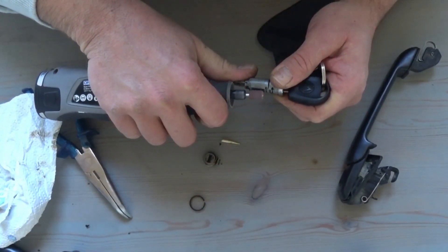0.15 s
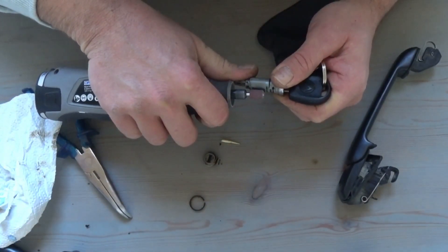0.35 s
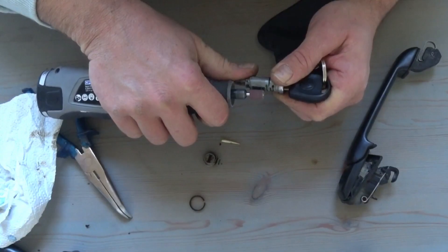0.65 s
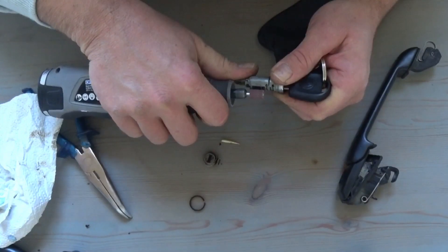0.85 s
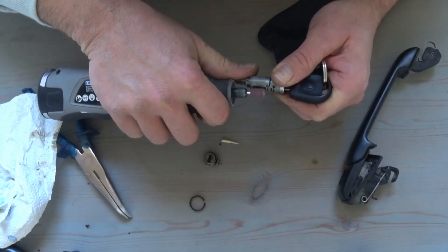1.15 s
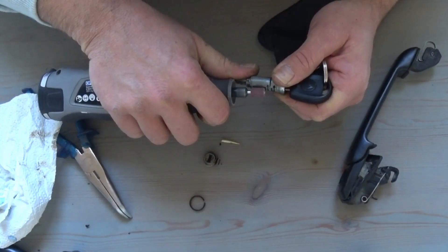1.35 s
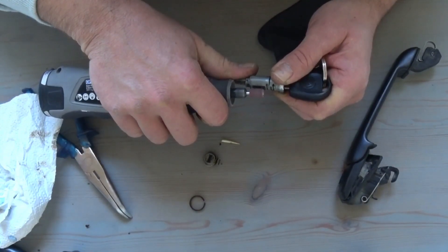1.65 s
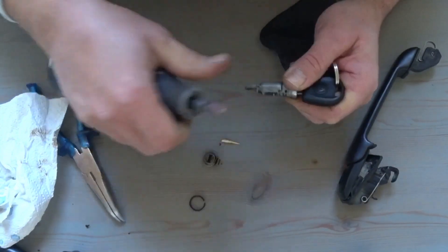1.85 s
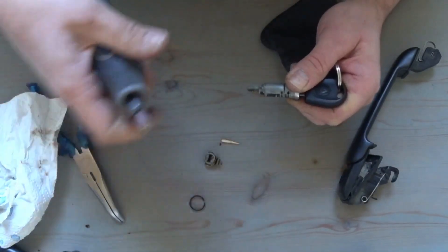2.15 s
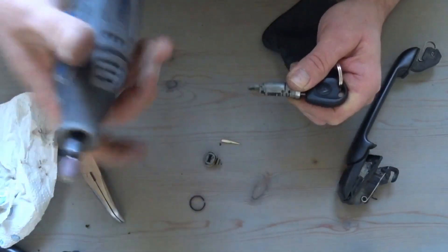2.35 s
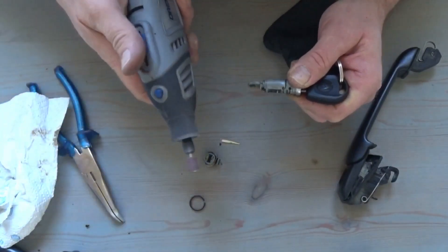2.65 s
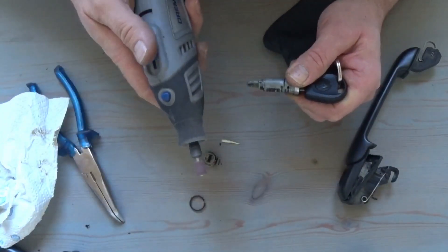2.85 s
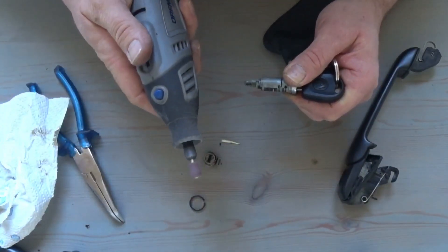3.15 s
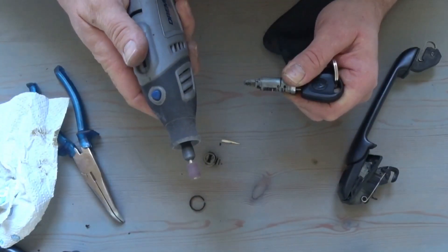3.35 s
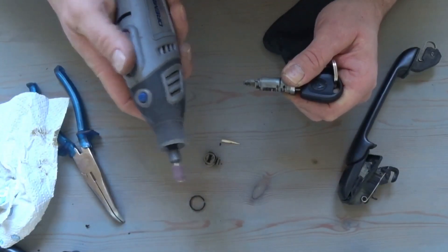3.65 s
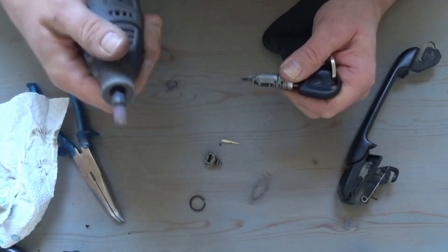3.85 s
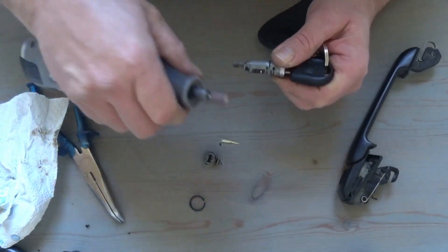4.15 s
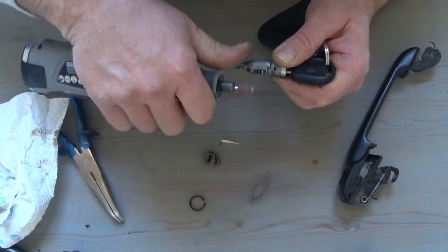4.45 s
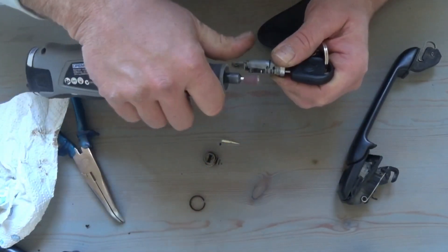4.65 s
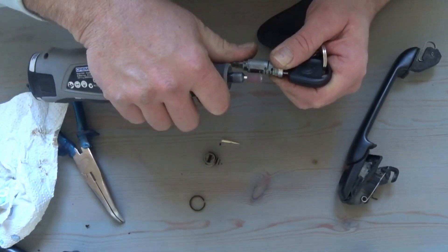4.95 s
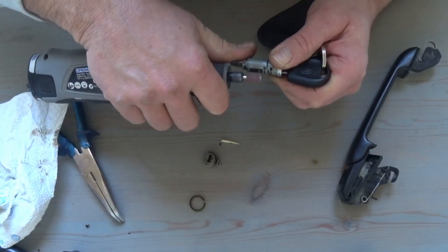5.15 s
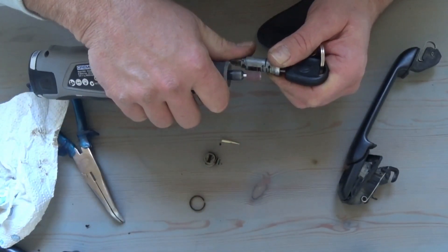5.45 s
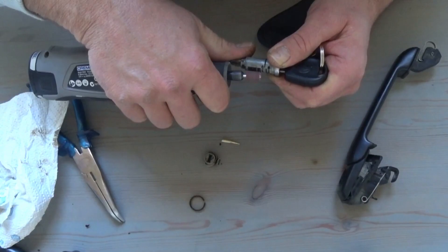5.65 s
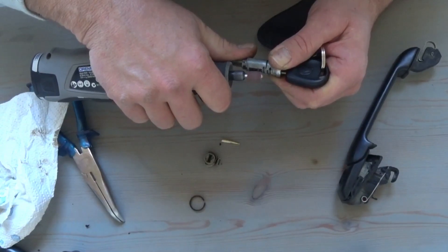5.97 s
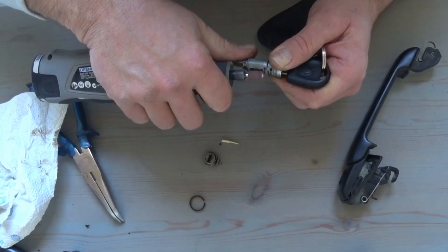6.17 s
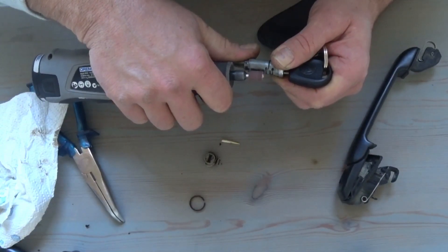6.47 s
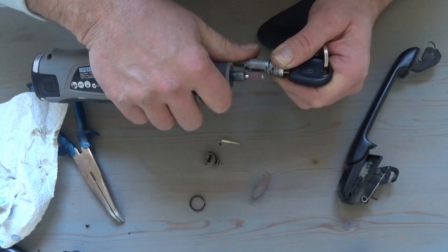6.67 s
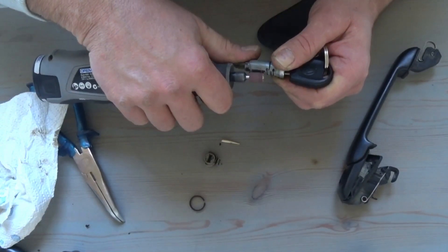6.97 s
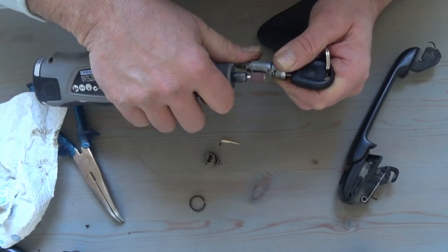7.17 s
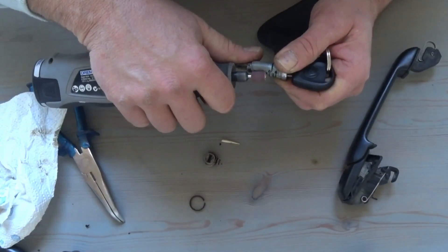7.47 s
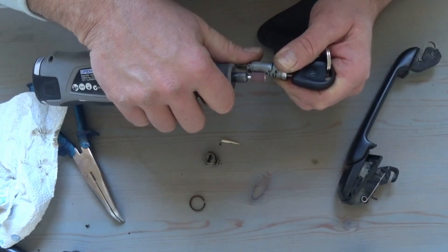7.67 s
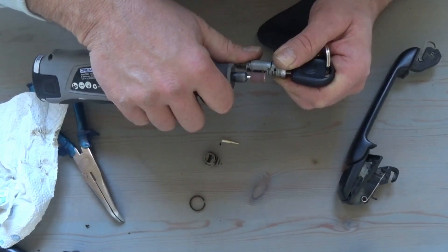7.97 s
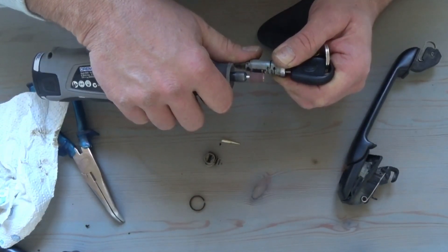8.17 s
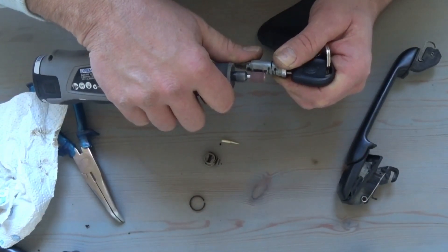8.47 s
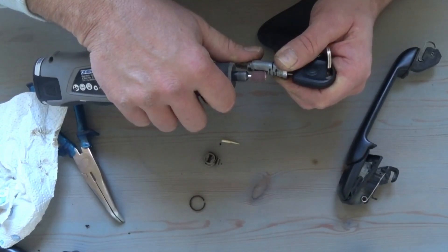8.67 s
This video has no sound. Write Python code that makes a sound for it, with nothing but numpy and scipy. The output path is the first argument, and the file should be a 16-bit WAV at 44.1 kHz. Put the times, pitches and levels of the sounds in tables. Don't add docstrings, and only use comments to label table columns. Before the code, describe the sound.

Gritty metal grinding comes first over a sagging motor buzz, then a quick lift-off and two dull, woody knocks with a brief rattle. The tool spins free, hissing and whining steadily, shifting in tone as the hand turns it, then winds up to a much higher whine. Later the stone bites again in several rasping strokes with little catches, the motor slowing and recovering. Recorded close at a workshop bench, slightly left, with short reflections and a soft rumble.

```python
import sys
import numpy as np
from scipy import signal
from scipy.fft import rfft, irfft, next_fast_len
from scipy.io import wavfile
from scipy.ndimage import uniform_filter1d, map_coordinates

SR = 44100
rng = np.random.default_rng(int(sys.argv[2]) if len(sys.argv) > 2 else 0)


def level_to_linear(level):
    exponent = np.asarray(level, float) / 20
    return 10 ** exponent


def generate_wav(sig):
    pcm = np.round(np.clip(np.atleast_2d(sig).T, -1, 1) * 32767).astype(np.int16)
    wavfile.write(sys.argv[1], SR, pcm)


N = 388521
HZ = np.fft.rfftfreq(next_fast_len(N), 1 / SR)
T = np.arange(N) / SR

# t/s, speed/(turns per s), lag/s
SPEED_STEPS = [(-.192, 65.5, .178), (.604, 54.8, .173), (1.424, 88.2, .143), (2.25, 90.2, .242),
               (2.977, 157.8, .2), (4.68, 155, .05), (5.2, 155.8, .05), (5.389, 75, .185),
               (5.75, 108.1, .147), (6.17, 132, .07), (6.5, 85.9, .09), (7.266, 150, .16),
               (7.513, 90.8, .13), (7.984, 69.4, .216), (8.275, 84.7, .159)]
FREE_HZ, DIAL_S = (90, 157), 4.2
# start/s, end/s, rasp at start/dB, rasp at end/dB, tap level/dB
STROKES = [
    (-.05, 0.4, -36.5, -35, -9),
    (0.438, 1.578, -35, -37, -8.5),
    (5.386, 6.235, -31, -34.5, -5),
    (6.407, 6.65, -37, -29, -2),
    (6.638, 7.394, -31.5, -31.5, -30),
    (7.458, 7.624, -35.5, -29.5, -25),
    (7.686, 7.96, -30, -32, -17),
    (7.955, 9, -32.5, -35, -7),
]
BITE_S, LIFT_S, LIFT_OFF_S = 0.055, 0.11, 0.053
# start/s, end/s
DIGGING = [
    (.56, 1.56),
    (6.68, 7.5),
    (7.68, 9),
]
WANDER, SLIP = .003, .05
# start/s, end/s, change/dB
SKIMS = [
    (0, .13, -3),
    (0.362, .52, -2.5),
    (6.3, 6.5, 1.5),
    (7.43, 7.7, -4.5),
]

# f/Hz, level per Hz/dB
RASP_FAST = [(71, -57), (120, -31), (276, -30), (333, -12), (417, -18.5), (524, -10.5), (1110, -4),
             (1370, 3), (1720, -3.5), (2610, 4), (5250, -3.5), (7370, -10), (8900, -10), (10200, -5),
             (11000, -10), (14200, -47), (22000, -120)]
RASP_SLOW = [(71, -54), (120, -15.5), (270, -17.5), (333, -5), (657, -2), (809, -3.5), (1140, -12.5),
             (1370, -6.5), (2420, -13.5), (3090, -1), (3530, -11), (3950, -3.5), (6340, -16), (7510, -14.5),
             (11000, -14.5), (14200, -51), (22000, -120)]
# f/Hz, width/Hz, level/dB
LOCK = [(157, 20, 9.5), (315, 13, -29), (515, 19, 13), (580, 27, -21), (844, 77, 13), (874, 41, -0.5),
        (1052, 17, 17), (1238, 40, 12.5), (1381, 57, 13.5), (1480, 40, 8.5), (1632, 36, 14.5),
        (2220, 130, 10.5), (2460, 170, 5), (2700, 100, -48), (2880, 49, -40), (3050, 120, -7),
        (3400, 190, -0.5), (4250, 170, 7), (5820, 400, 7.5), (7360, 1040, 14), (10300, 1050, 8.5)]
# f/Hz, level/dB
SMEAR_COLOUR = [(1500, 0.5), (4000, 0.5), (8000, -4)]
EDGE_COLOUR = [(1500, -26), (3500, -4.0), (5000, -0.5), (9000, 1.5)]
TAP_COLOUR = [(250, -20), (450, -8.5), (600, 2), (1300, -2), (2300, 0), (3200, 7), (4200, -18)]
TICK_DB, TICK_SHARE = -5, 0.085
RIDING_DB = -4
TAP_BOG_DB, TAP_FADES_AT = -71, 0.28

# multiple of shaft speed, level/dB
SLOW = [(1, -14.5), (2, -15.5), (3, -19.5), (4, -48), (5, -39), (6, -4.5), (7, -35), (8, -28), (9, 2.5),
        (10, -20), (11, -40), (12, 2), (13, -6), (14, -15), (15, 2), (16, -12), (17, -27), (18, -0.5)]
BOGGED = [(1, -25.5), (2, -27), (3, -13), (4, -13), (5, -9.5), (6, -5), (7, 3), (8, -31), (9, 3.5),
          (10, -8), (11, -8), (12, -6), (13, -4), (14, -3), (15, 0), (16, -10), (17, -24), (18, 5)]
FAST = [(1, -25.5), (2, -40), (3, -18), (4, -13), (5, -14.5), (6, 3), (7, -5), (8, 1), (9, -2), (10, -5.5),
        (11, -26), (12, -8), (13, -12), (14, -7.5), (15, -8), (16, -8.5), (17, -20), (18, -24)]
SETTINGS_HZ = [89, 105, 157]
WOBBLE_DB, WOBBLE_FROM_HZ = -3, (100, 140)
# f/Hz, width/Hz, level/dB
HOUSING = [(822, 40, -0.5), (944, 43, -2), (1228, 50, 2), (1407, 21, -22), (1770, 240, -2.5),
           (2144, 62, -4.5), (2515, 230, -1), (2930, 80, 0.5), (3277, 360, 0.5), (3690, 20, -1.5),
           (4446, 21, 0.5), (5600, 100, -7), (7490, 530, 4), (10360, 500, 6)]
# f/Hz, level per Hz/dB
AIR_UP = [(150, -55), (250, -27), (463, -11.5), (578, -3.5), (636, -9), (781, -3.5), (1120, -1.5),
          (1300, -3), (1520, -5), (2290, -6.5), (2640, -8.5), (4740, -4), (11000, -24), (14200, -52),
          (22000, -120)]
AIR_STEADY = [(150, -63), (250, -33), (616, -14.5), (806, -9), (915, -3.5), (1140, -5), (1280, -2),
              (1750, -13.5), (1860, -7.5), (2560, -7.5), (4520, -7.5), (6200, -15), (7150, -17),
              (10500, -26.5), (11000, -21.5), (14200, -53), (22000, -120)]
# f/Hz, level/dB
CLATTER_COLOUR = [(500, -6), (1800, -2), (2500, 0), (3500, -2.5), (5000, -4), (10000, -1)]
RENEW_PER_GLIDE = 15

# t/s, level/dB, facing the microphone 0-1, height above the bench 0-1
HELD = [(0, -43, 0, 0), (1.5, -41.5, 0.01, 0.25), (1.64, -44, 0, 0), (1.79, -44, 0.44, 0.17),
        (1.94, -40, 0.47, 0.5), (2.14, -38, 0.15, 0.77), (2.26, -40, 0.85, 0.32), (2.55, -37.5, 0.1, 0.24),
        (2.67, -39, 0.75, 0.05), (2.89, -40.5, 0.37, 0.28), (3.19, -41, 0.8, 0.02), (3.46, -38, 0.68, 0.04),
        (3.63, -37, 0.86, 0), (3.83, -36, 0.9, 1), (4.27, -34, 0.23, 0.44), (5.32, -34.5, 0.17, 0.22),
        (6.35, -35, 0.49, 0.35), (8.81, -37, 0.39, 0.42)]
# start/s, end/s, patchiness/dB
SWINGS = [
    (1.62, 2.52, 1.8),
    (2.52, 3.5, 1),
    (3.5, 4.37, 2.5),
    (5.38, 6.6, 1.3),
]
STILL_DB, SWING_EDGE_S = .6, .08
# t/s, length/s, f/Hz, width/Hz, lift/dB
SWELLS = [(1.952, 0.03, 2710, 500, 0), (2.144, 0.087, 500, 65, 14), (2.26, 0.049, 4730, 300, 9),
          (2.3, .05, 2250, 200, 9), (2.7, 0.084, 2210, 99, 13), (2.4, 0.03, 4300, 300, 2),
          (2.78, .04, 4150, 300, 5), (1.85, .05, 1460, 52, 5), (3.71, .05, 2060, 130, 3),
          (3.5, 0.076, 1280, 63, 0), (3.65, .05, 2220, 160, 1), (3.64, 0.15, 580, 29, 11),
          (3.693, 0.085, 1760, 310, 0), (3.782, 0.087, 5600, 370, 2), (3.852, 0.11, 4500, 530, 1),
          (3.977, 0.028, 3800, 400, 1), (4.117, 0.026, 3300, 300, -3), (4.535, 0.033, 4600, 220, -1),
          (4.85, 0.59, 2520, 170, -6), (4.94, 0.41, 3500, 220, -4), (4.603, 0.13, 4420, 140, -6),
          (4.11, .04, 3500, 200, 2), (4.25, 0.13, 2380, 130, 2), (0.87, 0.17, 754, 71, 1.5),
          (2.93, 0.21, 1390, 200, 4), (3.403, 0.027, 2940, 250, 1), (7.9, 0.056, 2300, 180, -1),
          (5.62, 0.046, 2150, 160, -5), (5.93, 0.025, 2280, 210, 1), (5.564, 0.068, 2840, 190, -3),
          (5.569, 0.033, 1280, 140, 5), (5.79, 0.053, 1260, 110, 6.5), (7.627, 0.013, 1260, 60, 12.5),
          (8.55, 0.023, 1340, 90, 9), (7.74, 0.034, 2500, 450, -4), (8.8, 0.034, 3360, 130, -3),
          (9.5, 0.039, 1350, 74, -5), (7.8, 0.083, 1400, 210, -5), (5.41, .03, 2200, 240, 4),
          (6.5, 0.034, 1300, 76, 0)]
BASS_DB, LOW_DB, HIGH_DB = -19.5, -3, -9.5
STONE_BASS_DB, STONE_LOW_DB, STONE_HIGH_DB = 0.5, -2, 3.5
BOG_BASS_DB, BOG_LOW_DB, FACING_HIGH_DB = 16.5, 11, 7.5
HEIGHT_LOW_DB, HEIGHT_BASS_DB, FAST_LOW_DB = -10.5, -2, -2
WHINE_DB, WHINE_BITE_DB, WHINE_BOG_DB, WHINE_SLOW_DB = -4.5, -7, -25, -4
GRIP_S, GRIP_DB = 6.75, -7

# t/s, peak/dB
CATCHES = [(0.0258, -21), (0.0458, -22), (0.0718, -16), (0.157, -22), (0.184, -21), (0.2768, -23),
           (0.3207, -29), (0.4204, -19), (0.4549, -21), (0.4838, -22), (0.5521, -19), (0.6504, -21),
           (0.6843, -19), (0.782, -26), (1.053, -23), (1.0994, -29), (1.1612, -23), (1.296, -28),
           (1.3279, -22), (1.3598, -21), (1.3788, -23), (1.49, -19), (1.6746, -27), (2.4044, -25),
           (2.6539, -24), (4.4737, -17), (4.5376, -20), (5.037, -22), (5.2116, -18), (5.3872, -16),
           (5.5593, -16), (5.911, -14), (6.055, -18), (6.6473, -14), (6.6822, -17), (6.9676, -12),
           (6.9985, -18), (7.0673, -14), (7.1995, -19), (7.6899, -18), (7.705, -15), (8.1097, -16),
           (8.1549, -15), (8.4028, -24), (8.7459, -13)]
CATCH_DB, CATCH_S = -10, 0.0036
# f/Hz, level/dB
CATCH_COLOUR = [(900, -20), (2200, 1), (9000, -4)]
# f/Hz, level per Hz/dB
SHOP = [(12, -31), (20, 1.5), (114, -10.5), (151, -9), (354, -11.5), (381, -10), (414, -17), (458, -8),
        (492, -7), (600, -9.5), (780, -24), (1320, -120)]
SHOP_DB = -59
# start/s, end/s, f/Hz, level/dB
HUMS = [
    (.08, 0.363, 157, -61),
    (.5, .7, 93, -67),
    (5.4, 5.744, 148, -62.5),
    (6.75, 7.3, 154, -63.5),
    (6.848, 7.15, 94, -73),
    (8.203, 8.62, 158, -63.5),
    (8.15, 8.45, 92.5, -68),
]
HUM_WIDTH_HZ = 14
# t/s, strength/dB, push/ms, spot struck (0 low, 1 high)
KNOCKS = [
    (1.6735, -13, .4, 0),
    (1.6805, -15.5, 1.3, 0),
    (1.714, -22, .8, .2),
    (1.742, -28, 1.5, 0),
    (1.775, -26, 1.5, 0),
    (1.8005, -15, .7, 1),
    (1.826, -27, 1.1, .6),
    (2.0, -42, 2, 0),
    (2.13, -40, 2, 0),
]
# f/Hz, t60/s, struck low/dB, struck high/dB, left minus right/dB
CAMERA_BODY = [(156, .15, -9, -11, -7), (205, .12, 2.5, -2, -3), (252, .26, -6, -9, -4), (295, .11, -9, -10, 4),
               (350, .115, -2, 3.5, 1), (420, .11, -11, -10, -3), (470, .08, -9, -12, 4),
               (522, .12, -13, -15, -4), (605, .1, -9, -11, 3), (670, .06, -3, -8, -4), (830, .07, -18, -19, -6),
               (1000, .1, -20, -19, 6), (1180, .08, -20, -19, 3), (1330, .1, -21, -26, -3)]
# t/s, level/dB, f/Hz, t60/s
THUDS = [(1.679, -40, 65, 0.41), (1.683, -26.5, 130, 0.26), (1.676, -25.5, 256, 0.42),
         (1.6745, -21, 220, .06), (1.745, -28, 237, .1), (1.675, -35, 700, 0.054), (1.676, -35, 1050, .1),
         (1.809, -32, 340, 0.052), (1.809, -30.5, 182, 0.23), (1.1, -51, 81, 0.18), (1.92, -51, 76, 0.27),
         (2.099, -48, 116, 0.15), (3.45, -59, 71.5, 0.47), (5.41, -46, 34.6, 0.37)]
# f/Hz, level/dB
BENCH = [(90, -33), (170, -11), (280, 1), (520, 0), (1000, -20), (2000, -43)]
BENCH_DB, BENCH_T60_S = -21, .16
# f/Hz, left minus right/dB
LEAN = [(200, 0), (340, 2), (600, 1.3), (1060, 3.6), (1880, 3.3), (3330, 1), (5900, 0)]
# f/Hz, room against direct/dB
WIDE = [(60, -2), (110, -10), (190, 6), (340, 0.5), (600, -12.5), (1060, -10), (1880, -7), (3330, -16),
        (5920, -27.5), (10500, -22.5)]


def unit(x):
    return x / np.sqrt(np.mean(x ** 2))


def curves(table):
    s, *columns = np.transpose(table)
    return [np.interp(T, s, column) for column in columns]


def shape(points):
    hz, db = np.transpose(points)
    return level_to_linear(np.interp(np.log(HZ + 1), np.log(hz + 1), db))


def humps(peaks, share):
    top_db = max(p[2] for p in peaks)
    power = sum(share * level_to_linear(db - top_db) ** 2 / (1 + (2 * (HZ - hz) / width) ** 2)
                for hz, width, db in peaks)
    return np.sqrt(1 + power)


def colour(x, gain):
    size = next_fast_len(N)
    return irfft(rfft(x, size) * gain, size)[..., :N]


def walk(rate):
    k = int(SR / rate)
    held = np.repeat(rng.standard_normal(N // k + 1), k)
    return 1.1 * uniform_filter1d(uniform_filter1d(held, k), k)[:N]


def span(start, end, rise_s, fall_s, t=T):
    return (1 + np.tanh((t - start) / rise_s)) * (1 - np.tanh((t - end) / fall_s)) / 4


def ring(hz, t60):
    t = T[:SR // 2]
    return np.sin(2 * np.pi * hz * t) * np.exp(-np.log(1000) * t / t60)


def shaft():
    hz, before = FREE_HZ[0], FREE_HZ[0]
    for s, aim, lag in SPEED_STEPS:
        late = np.maximum(T - s, 0) / lag
        hz = hz + (aim - before) * (1 - (1 + late) * np.exp(-late))
        before = aim
    return hz


def repeating(turn, renew_s):
    rows = rng.standard_normal((int(9 / .02), 512))
    rows = np.concatenate([rows, rows[:, :1]], axis=1)
    glided = np.cumsum(np.abs(np.gradient(np.log(shaft()))))
    row = np.minimum(T / renew_s + RENEW_PER_GLIDE * glided, len(rows) - 1)
    return unit(map_coordinates(rows, [row, turn % 1 * 512], order=1))


def rasp(turn, digging):
    grit = rng.standard_normal(N) * level_to_linear(2.6 * np.minimum(rng.exponential(size=N), 5))
    same_grit = level_to_linear(.5) * repeating(turn, renew_s=.1)
    high_spot = 1 + 3.1 * np.exp(-((turn + 0.1 * walk(30)) % 1) / 0.48)
    bites = (rng.random(N) < 90 / SR) * rng.uniform(0.037, 1, N)
    bounce = 1 + 1.1 * signal.lfilter([1], [1, -np.exp(-1 / (.005 * SR))], bites)
    chatter = level_to_linear(np.minimum(2.1 * walk(70) + 0.6 * walk(14), 3.5)) * bounce
    chatter = np.minimum(chatter, 1.7)
    scratch = unit((unit(grit) + same_grit) * high_spot * chatter)
    scratch = scratch + 0.86 * colour(rng.standard_normal(N), shape(SMEAR_COLOUR))
    riding = (1 - digging) * (T > DIAL_S)
    scratch = scratch + level_to_linear(RIDING_DB) * riding * repeating(turn, renew_s=.11)
    edge = np.exp(-((turn + .12 * walk(60)) % 1) / TICK_SHARE)
    edge = edge * level_to_linear(2.7 * walk(80)) * rng.standard_normal(N)
    scratch = scratch + level_to_linear(TICK_DB) * colour(unit(edge), shape(EDGE_COLOUR))
    slow, fast = (unit(colour(scratch, shape(points) * humps(LOCK, 11.6))) for points in (RASP_SLOW, RASP_FAST))
    return np.where(T < 3, slow, fast)


def taps(turn, bog):
    uneven = (.003 + .016 * bog) * walk(45)
    tap = np.exp(1000 * (np.cos(2 * np.pi * (turn + uneven)) - 1)) * level_to_linear(2.5 * walk(30))
    return unit(colour(tap, shape(TAP_COLOUR) * humps(LOCK, 24.0)))


def whine(shaft_hz, turn, pressure):
    out = 0
    glide = np.maximum(np.gradient(np.log(shaft_hz)) * SR, 0)
    glide = uniform_filter1d(glide, SR // 10)
    for (order, slow_db), (_, bogged_db), (_, fast_db) in zip(SLOW, BOGGED, FAST):
        db = np.interp(shaft_hz, SETTINGS_HZ, [slow_db, bogged_db, fast_db])
        db = db + 2.2 * walk(5) + (2.2 * pressure + 9 / (3 + order)) * walk(23)
        db = db - .19 * order * glide
        drift = (.85 + .5 * pressure) * walk(14) + .06 * order * walk(40)
        drift = drift + rng.uniform(0, 2 * np.pi)
        out = out + level_to_linear(db) * np.sin(2 * np.pi * np.round(order) * turn + drift)
    wobble = np.interp(shaft_hz, WOBBLE_FROM_HZ, [.15, .55])
    out = out * (1 + wobble * np.cos(np.pi * turn + .6 * walk(8)))
    return unit(colour(out, humps(HOUSING, 5.1)))


def air(turn, shaft_hz):
    wobble = level_to_linear(WOBBLE_DB) * np.interp(shaft_hz, WOBBLE_FROM_HZ, [.3, 1])
    pulse = 1 + 0.15 * np.cos(2 * np.pi * turn)
    clatter = repeating(turn, renew_s=.11) + wobble * repeating(turn / 2, renew_s=.12)
    clatter = colour(clatter, shape(CLATTER_COLOUR))
    hiss = pulse * rng.standard_normal(N) * level_to_linear(1.1 * walk(25)) + level_to_linear(1.9) * clatter
    up, low = (unit(colour(hiss, shape(points) * humps(HOUSING, 10.4))) for points in (AIR_UP, AIR_STEADY))
    steady = np.interp(T, [1.5, 1.7, 4.0, 4.3], [1, 0, 0, 1])
    return up + steady * (low - up)


def turning(sound):
    hz, s, spec = signal.stft(sound, SR, nperseg=1024)
    field = rng.standard_normal((56, 120))
    places = np.meshgrid(np.minimum(hz / 200, 55), s * 13, indexing="ij")
    lobes = map_coordinates(field, places, order=3)
    patchy_db = STILL_DB + sum((db - STILL_DB) * span(a, b, SWING_EDGE_S, SWING_EDGE_S, s)
                               for a, b, db in SWINGS)
    gain = level_to_linear(lobes * np.minimum(hz / 2500, 1)[:, None] * patchy_db)
    sound = signal.istft(spec * gain, SR, nperseg=1024)[1][:N]
    out = sound.copy()
    for s, length, hz, width, db in SWELLS:
        near = slice(int((s - 3 * length) * SR), int((s + 3 * length) * SR))
        b, a = signal.iirpeak(hz, hz / width, SR)
        passing = np.exp(-((T[near] - s) / length) ** 2)
        out[near] += level_to_linear(db) * passing * signal.lfilter(b, a, sound[near])
    return out


def tool():
    shaft_hz = shaft()
    digging = sum(span(s, end, .04, .04) for s, end in DIGGING)
    fast = T > DIAL_S
    slipping = .005 * (shaft_hz < 115) * fast + SLIP * digging
    turn = np.cumsum(shaft_hz * (1 + WANDER * walk(9) + slipping * walk(35))) / SR
    held_db, facing, height = curves(HELD)

    bites = []
    for s, end, db, end_db, _ in STROKES:
        lift_s = LIFT_S if s > DIAL_S else LIFT_OFF_S
        bites.append(level_to_linear(np.interp(T, [s, end], [db, end_db])) * span(s, end, BITE_S, lift_s))
    stone = sum(bite ** 2 for bite in bites)
    power = stone + level_to_linear(held_db) ** 2
    pressure = stone / power
    tapping = sum(bite * level_to_linear(row[-1]) for bite, row in zip(bites, STROKES)) / np.sqrt(power)
    bog = np.clip(1 - shaft_hz / np.where(fast, FREE_HZ[1], FREE_HZ[0]), 0, 1)
    bog = bog * ((T < SPEED_STEPS[4][0]) | fast)

    whine_db = WHINE_DB + WHINE_BITE_DB * pressure + WHINE_BOG_DB * bog
    whine_db = whine_db + WHINE_SLOW_DB * pressure * ~fast + GRIP_DB * (T > GRIP_S)
    sound = np.sqrt(1 - pressure) * air(turn, shaft_hz) + np.sqrt(pressure) * rasp(turn, digging)
    tap_gain = level_to_linear(TAP_BOG_DB * np.maximum(bog - TAP_FADES_AT, 0))
    sound = sound + tapping * tap_gain * taps(turn, bog)
    sound = turning(sound + level_to_linear(whine_db) * whine(shaft_hz, turn, pressure))

    bass_db = BASS_DB + STONE_BASS_DB * pressure + BOG_BASS_DB * bog + HEIGHT_BASS_DB * height
    bass_db = bass_db + sum(db * span(a, b, 0.026, .03) for a, b, db in SKIMS)
    low_db = LOW_DB + STONE_LOW_DB * pressure + BOG_LOW_DB * bog
    low_db = low_db + HEIGHT_LOW_DB * height + FAST_LOW_DB * fast
    high_db = HIGH_DB + STONE_HIGH_DB * pressure + FACING_HIGH_DB * facing
    bass, low, middle = (1 / (1 + (HZ / edge) ** 8) for edge in (750, 1800, 5000))
    out = 0
    for band, db in ((bass, bass_db), (low - bass, low_db), (middle - low, 0), (1 - middle, high_db)):
        part = colour(sound, band)
        out = out + part / np.sqrt(uniform_filter1d(part ** 2, SR // 2)) * level_to_linear(db)
    return out * np.sqrt(power)


def shop():
    mid, side = colour(rng.standard_normal((2, N)), shape(SHOP + [(900, -60)]))
    side = colour(side, shape([(60, -13), (250, 0.5)]))
    return unit(mid * level_to_linear(0.31 * walk(3.07)) + side * np.array([[1], [-1]])) * level_to_linear(SHOP_DB)


def catches():
    burst = sum(level_to_linear(db + CATCH_DB) * (T > s) * np.exp(-np.maximum(T - s, 0) / CATCH_S) for s, db in CATCHES)
    gain = shape(RASP_FAST) * humps(LOCK, 5.0) * shape(CATCH_COLOUR)
    return burst * unit(colour(rng.standard_normal(N), gain))


def hum():
    noise = rng.standard_normal(N)
    out = 0
    for s, end, hz, db in HUMS:
        drone = unit(colour(noise, 1 / (1 + (2 * (HZ - hz) / HUM_WIDTH_HZ) ** 2)))
        out = out + level_to_linear(db) * span(s, end, 0.047, 0.064) * drone
    return out


def knocks():
    sides = np.array([[1], [-1]])
    out = np.zeros((2, N))
    for s, db, push_ms, spot in KNOCKS:
        body = 0
        for k, (hz, t60, low_db, high_db, lean_db) in enumerate(CAMERA_BODY):
            note_db = low_db + spot * (high_db - low_db) + sides * lean_db / 2
            body = body + (-1) ** k * level_to_linear(note_db) * ring(hz, t60)
        push = np.hanning(int(push_ms * SR / 500))[None]
        blow = signal.fftconvolve(body, push / push.sum(), axes=1)
        out[:, int(s * SR):][:, :blow.shape[1]] += sides * level_to_linear(db) * blow
    for s, db, hz, t60 in THUDS:
        out[:, int(s * SR):][:, :SR // 2] += level_to_linear(db) * ring(hz, t60)
    return out


def bench():
    shake = 0
    for s, db, *_ in KNOCKS:
        fade = np.exp(-np.log(1000) * np.maximum(T - s, 0) / BENCH_T60_S)
        shake = shake + level_to_linear(db) * (T > s) * fade
    return level_to_linear(BENCH_DB) * shake * unit(colour(rng.standard_normal((2, N)), shape(BENCH)))


def scene():
    direct = tool() + catches()
    tail = rng.standard_normal(SR // 4) * np.exp(-np.log(1000) * T[:SR // 4] / .15)
    echo = signal.fftconvolve(direct, tail / np.linalg.norm(tail))[:N]
    room = colour(echo, shape(WIDE) * level_to_linear(-1.0))
    lean = np.sqrt(shape(LEAN))
    stereo = np.array([colour(direct, lean) + room, colour(direct, 1 / lean) - room])
    return stereo + knocks() + shop() + bench() + hum()


def roll_off(x):
    return signal.sosfilt(signal.butter(12, 11110, fs=SR, output="sos"), x)


def record(dry):
    mix = colour(dry, HZ < 11025)
    return roll_off(mix)


dry = scene()
out = record(dry)
generate_wav(out)
```